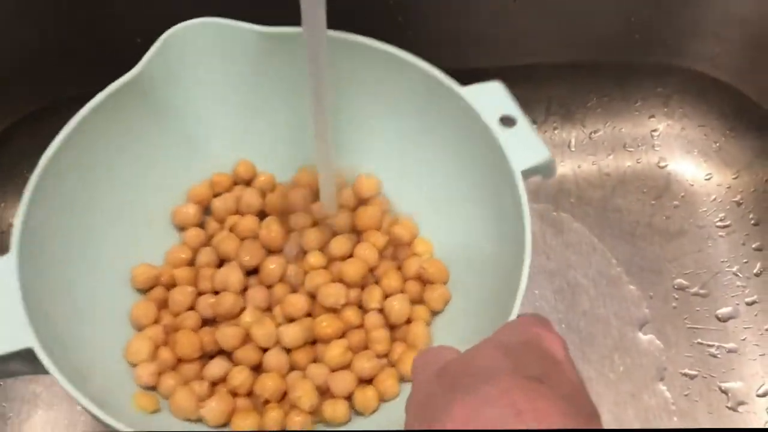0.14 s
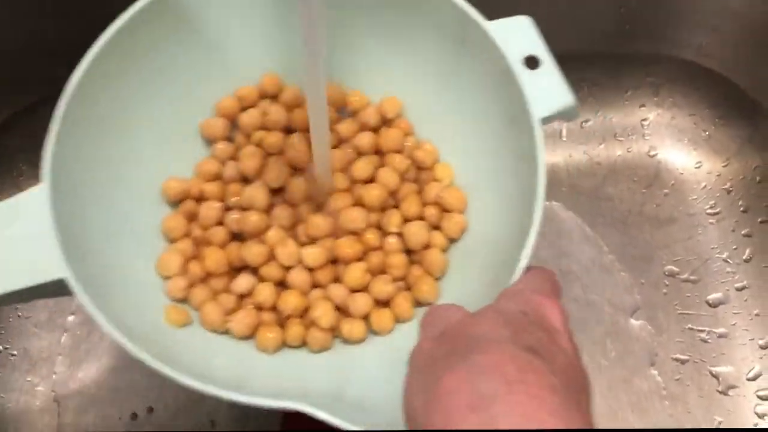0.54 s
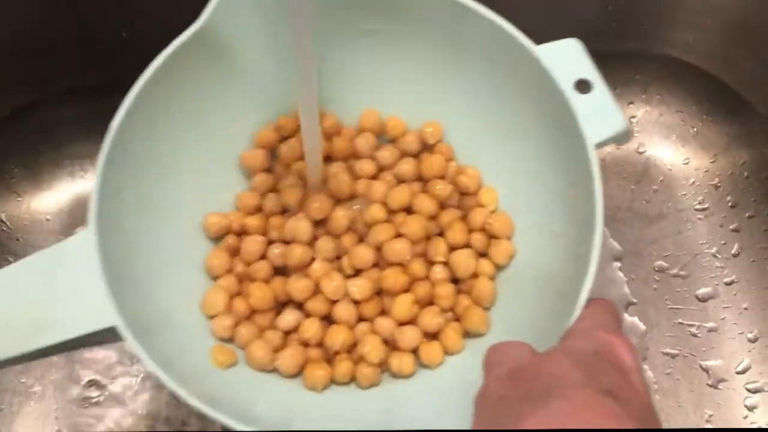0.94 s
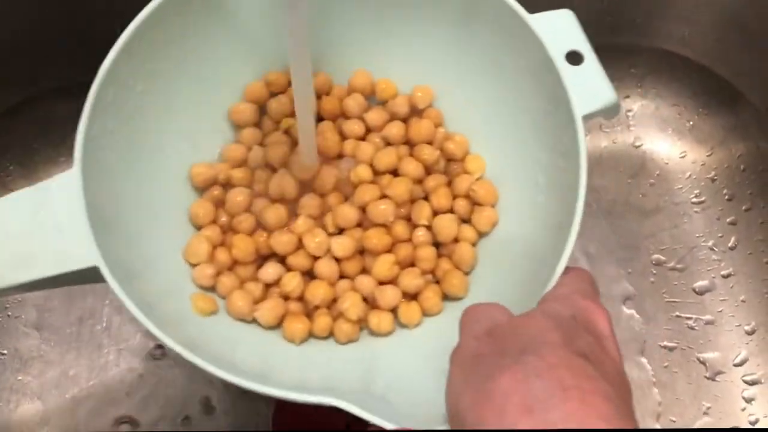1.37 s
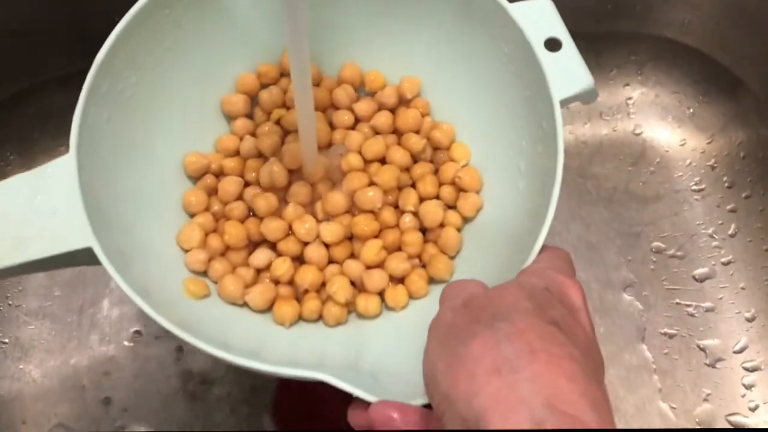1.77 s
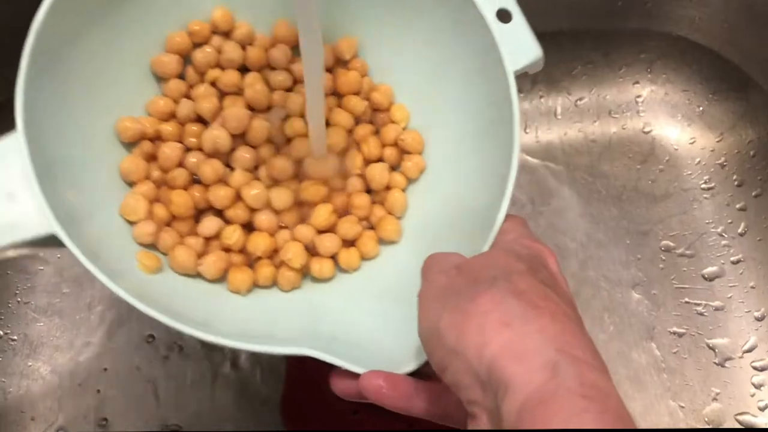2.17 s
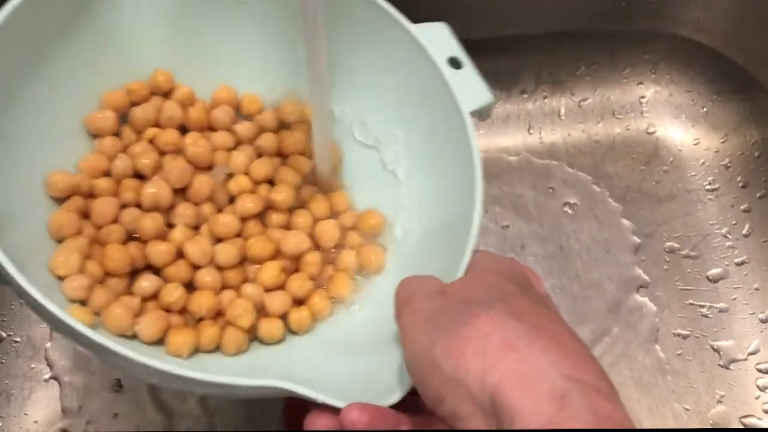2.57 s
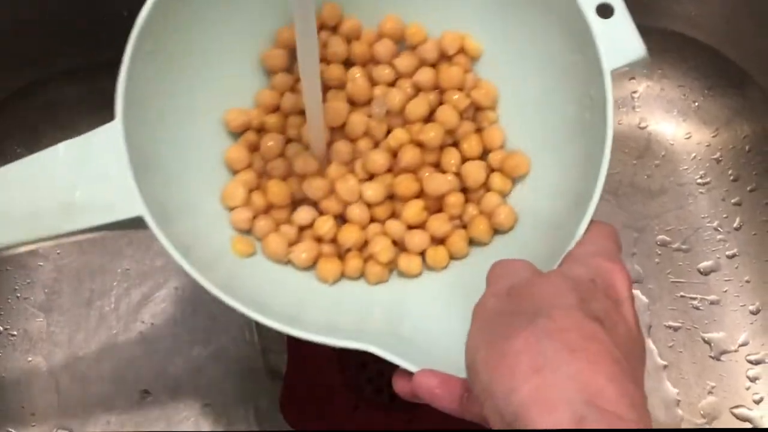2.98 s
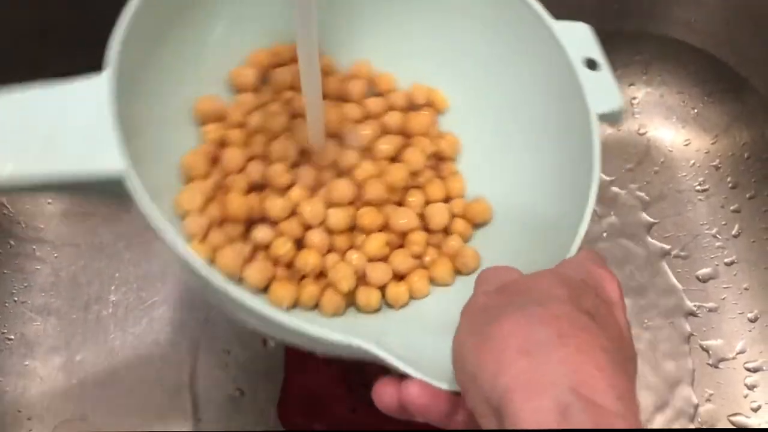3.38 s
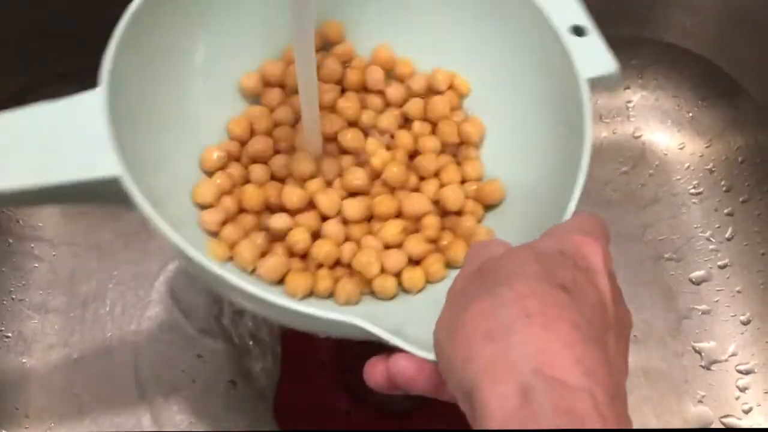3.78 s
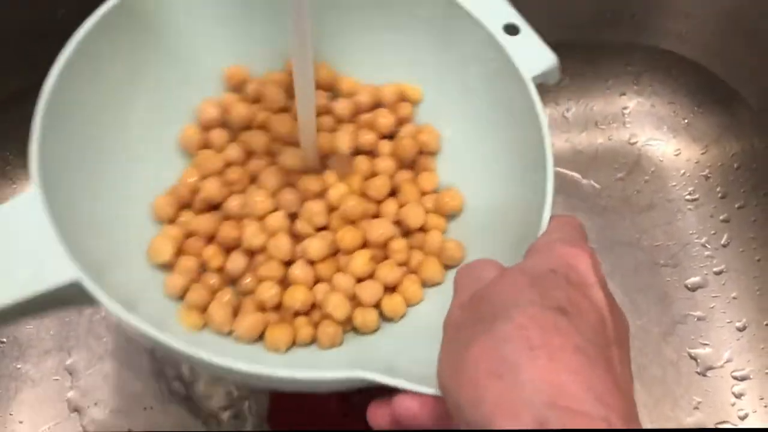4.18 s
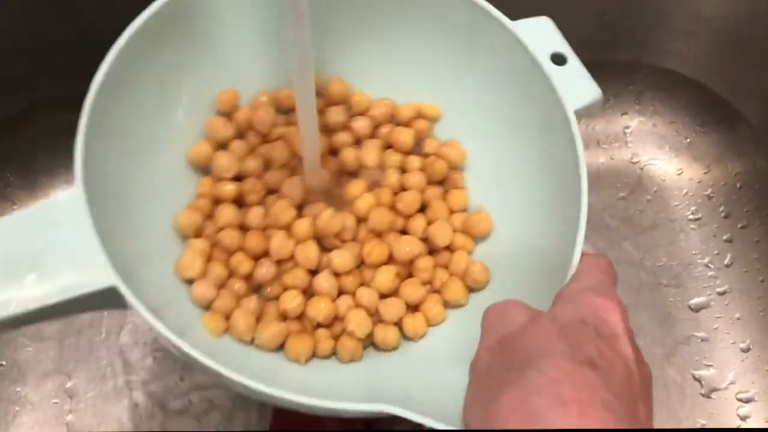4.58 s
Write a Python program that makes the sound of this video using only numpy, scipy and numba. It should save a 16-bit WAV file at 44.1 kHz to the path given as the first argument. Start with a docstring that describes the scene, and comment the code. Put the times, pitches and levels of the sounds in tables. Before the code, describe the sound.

A kitchen tap streams onto chickpeas in a plastic colander, bright bubbly fizzing and splashing, with a few dull bumps against a steel sink.

```python
"""In a kitchen, a tap runs onto chickpeas in a plastic colander held over a steel sink.
The jet traps air between the peas: swarms of short bubbles chirp upwards, made of sine tones that swell,
fade and glide. Loud single bubbles, gargles and droplet clicks join them, over a splash hiss of filtered noise.
Drained water drums the basin and the colander bumps it now and then, both ringing its steel modes;
appliances hum quietly behind."""
import sys
import numpy as np
from scipy import signal
from scipy.fft import rfft, irfft
from scipy.io import wavfile
from scipy.ndimage import uniform_filter1d
from numba import njit

SR = 44100
rng = np.random.default_rng(int(sys.argv[2]) if len(sys.argv) > 2 else 0)


def transcribe(u):
    """Save the signal u as a 16-bit wav file named by the first command-line argument.

    u: samples, shape (n,) or (channels, n), limited to [-1, 1]; the rate is SR.
    q: integer samples, one column per channel.
    """
    v = np.clip(np.atleast_2d(u).T, -1, 1)
    q = np.round(v * 32767).astype(np.int16)
    wavfile.write(sys.argv[1], SR, q)


N = 208409  # length in samples

# Kinds of bubble swarm, and droplets striking peas and plastic (clicks of a cycle or two):
# pitch spread/octaves, rate/(1/s), length/cycles, mean upward glide/octaves, size scatter/dB
COARSE_BUBBLES = (0.37, 2600, 7.4, 0.94, 6.1)
FINE_BUBBLES = (0.24, 3000, 7.0, 0.75, 5.1)
SPRAY_BUBBLES = (0.28, 4000, 5.2, 0.37, 6)
GURGLE_BUBBLES = (0.3, 650, 11, 0.15, 2.2)
DROPLET_CLICKS = (1.22, 506, 1.26, -0.5, 2.5)
# The jet as the colander is swirled under it: t/s, fine bubble level/dB, coarse level re fine/dB
JET_LEVELS = [(0.0, -38.5, -4), (0.06, -41, -7), (0.24, -37.5, -23), (0.28, -44.5, -6.5), (0.4, -40, -5),
              (0.55, -43.5, -5), (0.86, -43.5, -6.5), (0.97, -38, -7.5), (1.15, -43.5, -16),
              (1.3, -40, -12.5), (1.45, -40, -6.5), (1.55, -46, 4.5), (1.59, -46, 3.5), (1.63, -42.5, -0.5),
              (1.72, -40.5, -0.5), (1.84, -43, -5), (1.89, -45, -14), (1.93, -41, -9), (1.97, -42.5, -6),
              (2.32, -44.5, -10.5), (2.39, -45, -6), (2.58, -42.5, -2), (2.67, -40.5, -7.5),
              (2.7, -41.5, -8.5), (2.74, -42, -4), (2.82, -46.5, -9), (2.9, -43.5, -4.5), (2.96, -49, -5.5),
              (3.01, -39.5, -17), (3.13, -45, -11), (3.24, -43, -5.5), (3.3, -47.5, -6), (3.38, -41, -2),
              (3.43, -41.5, -4), (3.53, -49.5, -8.5), (3.64, -43.5, 1), (3.78, -40.5, -6),
              (3.86, -49.5, -4), (3.96, -43, -8), (4.02, -40, -1), (4.08, -47, 5), (4.13, -49, 0),
              (4.16, -45.5, 0), (4.21, -45, -1.5), (4.33, -43, 0.5), (4.42, -47.5, 3), (4.56, -40, 0),
              (4.66, -44.5, 1.5), (4.73, -47.5, 3)]
# Slow drift; bubbles are largest where the jet meets the bare rim:
# t/s, coarse f/Hz, fine f/Hz, spray level/dB (before it follows the jet), gurgle level/dB
SLOW_DRIFT = [(0, 4220, 7880, -48, -59), (0.5, 3890, 7130, -50.5, -61.5), (1.0, 4640, 7080, -44, -59),
              (1.3, 4370, 7500, -47, -57), (1.7, 4460, 7520, -45, -67), (2.0, 4550, 6810, -52.5, -61.5),
              (2.45, 3280, 7440, -49.5, -63), (2.7, 3600, 8120, -53, -58), (2.9, 4120, 6850, -50, -58),
              (3.05, 4240, 7320, -49, -58.5), (3.25, 4150, 7830, -47.5, -59), (3.5, 4060, 7380, -47, -56),
              (4.1, 4300, 6840, -51.5, -58), (4.73, 4500, 7260, -47, -57.5)]
# Loud single bubbles, from tiny bright ones to large glugs: t/s at the peak, peak level/dB, f/Hz at the peak
LOUD_BUBBLES = [(0.1654, -20.5, 8040), (0.2285, -23, 7900), (0.265, -37, 7600), (0.52, -46, 1600),
                (0.3445, -29, 4200), (0.349, -24, 5760), (0.3903, -25, 7200), (0.4025, -22, 7000),
                (0.4126, -24, 7900), (0.4395, -24, 8800), (0.462, -34, 3480), (0.472, -32, 4050),
                (0.4953, -22, 7700), (0.51, -35, 4200), (0.5286, -33, 3280), (0.563, -25.5, 3420),
                (0.5818, -26.5, 4100), (0.596, -35, 3600), (0.6286, -28, 3960), (0.676, -24, 7400),
                (0.693, -19.5, 12500), (0.711, -21.5, 7100), (0.9279, -20, 6100), (0.997, -25, 5400),
                (1.0252, -19, 10600), (1.0399, -24, 8200), (1.064, -44, 1790), (1.0722, -19.5, 4850),
                (1.0767, -21, 7840), (1.0825, -20, 7700), (1.088, -22, 7400), (1.108, -23, 8060),
                (1.156, -46, 1310), (1.183, -43, 1740), (1.208, -21, 7200), (1.296, -17.5, 7900),
                (1.305, -47, 1390), (1.4697, -22, 11600), (1.509, -25.5, 5000), (1.543, -24.5, 5450),
                (1.618, -28, 4600), (1.628, -30, 4300), (1.65, -27, 4560), (1.661, -28, 4500),
                (1.6817, -29, 7280), (1.6896, -16, 8460), (1.7236, -27, 4020), (1.732, -23, 4600),
                (1.745, -29.5, 3200), (1.7725, -31, 3300), (1.8176, -27, 6660), (1.853, -25.5, 5020),
                (1.97, -43, 2260), (1.997, -21, 7000), (2.0468, -25, 6560), (2.0538, -22, 12700),
                (2.059, -29, 6330), (2.124, -24.5, 5900), (2.279, -39.5, 2200), (2.361, -23, 8260),
                (2.3933, -18.5, 9500), (2.4788, -27.5, 3500), (2.5056, -24, 6000), (2.584, -43, 1870),
                (2.5859, -28, 3520), (2.6147, -30.5, 3060), (2.6098, -26, 6960), (2.6618, -26, 9120),
                (2.6742, -24.5, 8900), (2.727, -23, 8450), (2.7702, -22, 14550), (2.801, -33, 3900),
                (2.834, -43, 1380), (2.8683, -20.5, 13500), (2.956, -44, 1800), (2.994, -25, 8300),
                (3.012, -30, 6000), (3.051, -29, 5800), (3.113, -31, 14000), (3.1574, -23, 6740),
                (3.163, -23, 8000), (3.172, -33, 12500), (3.286, -42, 1800), (3.324, -26, 10200),
                (3.3872, -23.5, 7340), (3.416, -26, 6500), (3.46, -41.5, 1870), (3.572, -44.5, 1250),
                (3.59, -35.5, 1430), (3.597, -22, 7560), (3.599, -41, 1570), (3.611, -39.5, 1290),
                (3.6373, -23, 7800), (3.663, -21, 6400), (3.678, -27, 6000), (3.741, -30, 7000),
                (3.829, -40, 2110), (3.978, -30, 4000), (4.0145, -24, 4480), (4.0333, -27, 4370),
                (4.057, -34, 4100), (4.0591, -20.5, 11200), (4.0818, -29, 4330), (4.106, -27, 7500),
                (4.3096, -27, 4620), (4.346, -22, 5040), (4.352, -31, 6270), (4.451, -29, 6160),
                (4.5, -28, 7200), (4.547, -43, 2200), (4.5641, -24.5, 5300)]
# An air pocket under the peas gargles: t/s at the middle, length/s, level/dB, f/Hz, rise/octaves
AIR_GARGLES = [(0.268, 0.1, -56.5, 1450, 0.03), (0.707, 0.16, -53.5, 1312, 0.2),
               (0.89, 0.07, -54, 1580, 0.03)]
# Colour of the splash hiss; only the shape counts: f/Hz, relative level/dB per Hz
SPLASH_COLOUR = [(18, -40), (50, -2), (105, -15), (125, 0), (230, -8), (330, -1.5), (395, -11.5), (755, -7),
                 (1060, -7), (1310, -10), (1990, -14), (2250, -4.5), (7400, -11), (15800, -5.5)]
# Splash between 350 and 1000 Hz; only the changes count: t/s, level/dB
SPLASH_LOW_MIDS = [(0.0, -57.5), (0.25, -64), (1.03, -62), (1.28, -59), (1.96, -65), (2.24, -66),
                   (2.72, -64.5), (3.12, -62), (3.57, -62), (4.73, -63)]
# Swell of the drumming under the drain; only the changes count: t/s, level/dB
DRAIN_SWELL = [(0.3, -3), (1.4, 1.5), (3.0, -2), (3.7, -2), (4.73, -2)]
# Steel modes of the basin; close pairs beat, so a thump swells before it dies:
# f/Hz, relative level/dB, free ring t60/s
BASIN_MODES = [(181.8, -2.5, 0.18), (172.6, 3.5, 0.2), (214, -5, 0.12), (304, -11.5, 0.071),
               (455, -9, 0.18), (707, 2, 0.055), (1310, -13.5, 0.073), (1850, -26, 0.025)]
# The colander bumps the basin: t/s, blow level/dB, hardness/(dB per octave),
# share of the ring time left while it rests on the steel/(0-1)
COLANDER_BUMPS = [(0.008, -50, 3.5, 0.56), (0.7066, -32.5, -2.5, 1), (1.458, -32, -11, 0.16),
                  (4.47, -35, -17, 0.14)]
# Appliance hums: f/Hz, level/dB rms
APPLIANCE_HUMS = [(58, -79.5), (90, -83), (118, -68)]

SIZE_WANDER = 0.075  # octaves, wander of the coarse and fine pitch
LARGEST = 1.2  # spreads under the centre pitch: the gaps between peas cap the bubble size
SPRAY_HZ, GURGLE_HZ, CLICK_HZ = 12840, 1508, 7100  # centre pitches
SPRAY_FOLLOW, SPRAY_WANDER_DB = 0.32, 1.5  # share of the jet's swings; own wander
GURGLE_SURGE_DB = 1.2
CLICK_DB = -7  # re the fine bubbles, before the high-pass
PEA_HZ, BASIN_LOW_HZ = 2140, 113  # small sources radiate little below these
TRAIL_S, TRAIL_DB, TRAIL_SPREAD = 0.0062, -8, 0.13  # mean lag; highest level re the loud bubble; octaves
GARGLE_WIDTH_HZ = 190  # how fast the roughness changes
BOWL_T60_S, BOWL_DB = 0.1, -10  # short ring of bowl and basin
SPLASH_DB, SPLASH_FOLLOW, SPLASH_FLICKER_DB = -48, 0.32, 2.2  # rms; share of the flow's swings; own flicker
DRUM_DB, DRUM_FLICKER_DB = -58.5, 3  # rms before the high-pass; flicker
DRUM_DAMP = 0.17  # share of the ring time left: wet steel rings shorter under falling water
BASIN_RISE = 5.1  # cycles: the blow spreads through the steel before a mode swings fully
SCUFF_DB, SCUFF_T60_S, SCUFF_HZ = -3.5, 0.1, 1480  # wet contact noise, re the blow at hardness 0
MIC_LOW_HZ, TOP_HZ = 43.3, 15830


def undb(db):
    """Decibels to gain."""
    return 10 ** (np.asarray(db) / 20)


def level(x, db):
    """Scale to an rms level."""
    return x * undb(db) / np.sqrt(np.mean(x ** 2))


def curve(t, table):
    """Straight lines through a table whose first column is time; one curve for each other column."""
    columns = np.transpose(table)
    return [np.interp(t, columns[0], column) for column in columns[1:]]


def walk(rate):
    """Random levels held 1 / rate s, then smoothed twice; spread near 1."""
    hold = int(SR / rate)
    steps = np.repeat(rng.standard_normal(N // hold + 1), hold)
    return 1.284 * uniform_filter1d(uniform_filter1d(steps, hold), hold)[:N]


def ring(x, hz, t60):
    """One decaying mode, unit swing for a unit blow."""
    r = np.exp(-np.log(1000) / (t60 * SR))
    w = 2 * np.pi * hz / SR
    return signal.lfilter([0, np.sin(w)], [1, -2 * r * np.cos(w), r * r], x)


def above(x, hz):
    """High-pass."""
    return signal.sosfilt(signal.butter(2, hz, "high", fs=SR, output="sos"), x)


@njit
def bubbles(n, peak, hz, cycles, glide, size, turn, soft):
    """Each bubble swells, fades and glides, rising as it nears the surface; peak and hz hold at its loudest."""
    out = np.zeros(n)
    for k in range(len(peak)):
        tau = cycles[k] * SR / hz[k] / 3  # samples from start to peak
        phase = turn[k]
        start = max(peak[k] - int(tau), 0)
        for j in range(min(int(6 * tau), n - start)):
            u = j / tau
            f = hz[k] * 2 ** (glide[k] * (min(u, 4.) - 1) / 3)
            if f > .45 * SR:
                break
            phase += 2 * np.pi * f / SR
            out[start + j] += size[k] * (u * np.exp(1 - u)) ** soft * np.sin(phase)
    return out


def swarm(kind, hz, burst_db):
    """Bubbles at random moments round a centre pitch hz, mostly small, coming in bursts; rms 1."""
    spread, rate, cycles, glide, scatter_db = kind
    count = min(int(rate * N / SR), 30000)
    u, g = rng.random((4, count)), rng.standard_normal((2, count))
    peak = (u[0] * N).astype(np.int64)
    size = undb(scatter_db * np.minimum(-np.log(1 - u[1]), 3.1))
    # pitches below the LARGEST limit fold back up
    offset = np.minimum(np.abs(g[0] + LARGEST) - LARGEST, 2)
    pitch = (hz * np.ones(N))[peak] * 2 ** (spread * offset)
    y = bubbles(N, peak, pitch, cycles * 2 ** (0.36 * g[1]), glide * 2 * u[2], size, 2 * np.pi * u[3], 2.2)
    return level(y * undb(burst_db + 0.48 * walk(40)), 0)


def bubble_swarms(t, fine_db, coarse_db, sputter_db):
    """Air trapped by the jet leaves as coarse, fine, spray and gurgle bubbles."""
    coarse_hz, fine_hz, spray_db, gurgle_db = curve(t, SLOW_DRIFT)
    coarse_hz = coarse_hz * 2 ** (SIZE_WANDER * walk(24))
    fine_hz = fine_hz * 2 ** (SIZE_WANDER * walk(24))
    spray_db = spray_db + SPRAY_FOLLOW * (fine_db - fine_db.mean()) + SPRAY_WANDER_DB * walk(10)
    coarse = undb(coarse_db) * swarm(COARSE_BUBBLES, coarse_hz, sputter_db)
    fine = undb(fine_db) * swarm(FINE_BUBBLES, fine_hz, sputter_db)
    spray = undb(spray_db) * swarm(SPRAY_BUBBLES, SPRAY_HZ, sputter_db)
    gurgle = undb(gurgle_db) * swarm(GURGLE_BUBBLES, GURGLE_HZ, GURGLE_SURGE_DB * walk(25))
    return coarse + fine + spray + gurgle


def single_bubbles(cycles, glide, soft, count=3):
    """Loud bubbles, each with a trail of smaller ones breaking off; large ones ring longer and glide less."""
    s, db, hz = np.transpose(LOUD_BUBBLES)
    small = (hz / PEA_HZ) ** 0.33
    out = 0
    for k in range(1 + count):
        u = rng.random((6, len(s)))
        trail = min(k, 1)  # 0 for the loud bubble itself, 1 for its trail
        late_s = s - trail * TRAIL_S * np.log(1 - u[3])
        peak = (late_s * SR).astype(np.int64)
        pitch = hz * 2 ** (trail * TRAIL_SPREAD * 2 * (2 * u[4] - 1))
        size = undb(db + trail * (TRAIL_DB - 2 * u[5]))
        length = cycles / small * (0.66 + 0.52 * u[0])
        rise = glide * small * (.5 + u[1])
        out = out + bubbles(N, peak, pitch, length, rise, size, 2 * np.pi * u[2], soft)
    return out


def gargles(t):
    """An air pocket gives rough, wavering tones that swell and fade."""
    out = 0
    for s, length, db, hz, rise in AIR_GARGLES:
        u = np.clip((t - s) / length, -.5, .5)
        turn = 2 * np.pi * np.cumsum(hz * 2 ** (rise * u)) / SR
        rough = walk(GARGLE_WIDTH_HZ) * np.cos(turn) + walk(GARGLE_WIDTH_HZ) * np.sin(turn)
        out = out + undb(db) * np.cos(np.pi * u) * rough
    return out


def droplet_clicks(fine_db, sputter_db):
    """Droplets strike peas and plastic: very short tones, with little sound below PEA_HZ."""
    return undb(fine_db + CLICK_DB) * above(swarm(DROPLET_CLICKS, CLICK_HZ, sputter_db), PEA_HZ)


def bowl(x, count=5):
    """Dense early reflections in bowl and basin smear every bubble; they change as the bowl is swirled."""
    t = np.arange(int(.05 * SR)) / SR
    share = np.array([walk(8) for _ in range(count)])
    share = share / np.sqrt(np.sum(share ** 2, axis=0))
    tails = rng.standard_normal((count, len(t))) * 10 ** (-3 * t / BOWL_T60_S) * (t > .0005)
    tails = tails / np.sqrt(np.sum(tails ** 2, axis=1, keepdims=True))
    echoes = signal.oaconvolve(x * share, tails, axes=1)[:, :N].sum(axis=0)
    return x + undb(BOWL_DB) * echoes


def splash(t, flow_db):
    """The jet breaks up into hiss: half-octave noise bands flicker alone; the treble follows the flow."""
    hz = np.maximum(np.fft.rfftfreq(N, 1 / SR), 1)
    colour_hz, colour_db = np.transpose(SPLASH_COLOUR)
    colour = undb(np.interp(np.log(hz), np.log(colour_hz), colour_db))
    noise = rfft(rng.standard_normal(N)) * colour
    low_mid_db = curve(t, SPLASH_LOW_MIDS)[0] - np.transpose(SPLASH_LOW_MIDS)[1].mean() + 2.7 * walk(9)
    out = 0
    for centre in np.arange(4.5, 14.5, .5):  # octaves above 1 Hz
        shape = np.cos(np.pi * np.clip(np.log2(hz) - centre, -.5, .5)) ** 2
        band = irfft(noise * shape, N)
        follow = SPLASH_FOLLOW * np.clip(centre - 10.5, 0, 1)
        band_db = follow * flow_db + SPLASH_FLICKER_DB * walk(22.03)
        if 8.4 < centre < 10.1:
            band_db = band_db + low_mid_db
        out = out + band * undb(band_db)
    return level(out, SPLASH_DB)


def drumming(t):
    """Falling water acts as noise that keeps the damped steel modes ringing."""
    water = rng.standard_normal(N) * undb(DRUM_FLICKER_DB * walk(15) + curve(t, DRAIN_SWELL)[0])
    modes = [undb(db) * ring(water, hz, DRUM_DAMP * t60) for hz, db, t60 in BASIN_MODES]
    return level(sum(modes), DRUM_DB)


def bumps():
    """A blow rings every steel mode and adds a scuff; a harder one wakes the upper modes more."""
    out = np.zeros(N)
    for s, blow_db, hard_db, free in COLANDER_BUMPS:
        blow = np.zeros(N)
        blow[int(s * SR)] = undb(blow_db)
        fade = signal.lfilter([1], [1, -np.exp(-np.log(1000) / (SCUFF_T60_S * SR))], blow)
        scuff = ring(rng.standard_normal(N), SCUFF_HZ, 6 / SCUFF_HZ)
        out = out + undb(SCUFF_DB + 2 * hard_db) * fade * level(scuff, 0)
        for k, (hz, db, t60) in enumerate(BASIN_MODES):
            # taking away a shorter ring makes the swing build up gradually
            rise_t60 = free * min(BASIN_RISE / hz, t60 / 2)
            swing = ring(blow, hz, free * t60) - ring(blow, hz, rise_t60)
            gain = undb(db + hard_db * np.log2(hz / BASIN_MODES[0][0]))
            out = out + (-1) ** k * gain * swing
    return out


def appliance_hum(t):
    """Steady low sine tones whose levels waver slightly."""
    out = 0
    for hz, db in APPLIANCE_HUMS:
        out = out + undb(db + 0.41 * walk(3.0)) * np.sqrt(2) * np.sin(2 * np.pi * hz * t)
    return out


def scene():
    """All sources at one microphone."""
    t = np.arange(N) / SR
    fine_db, coarse_re_db = curve(t, JET_LEVELS)
    coarse_db = fine_db + coarse_re_db
    # the jet sputters: coarse, fine, spray and clicks surge together
    sputter_db = 0.53 * walk(34.86) + 1.25 * walk(150)
    water = bubble_swarms(t, fine_db, coarse_db, sputter_db)
    water = water + single_bubbles(cycles=19, glide=0.23, soft=6.0) + gargles(t)
    water = water + droplet_clicks(fine_db, sputter_db)
    flow_db = (coarse_db + fine_db) / 2
    hiss = splash(t, flow_db - flow_db.mean() + 3 * sputter_db)
    basin = above(drumming(t) + bumps(), BASIN_LOW_HZ)
    return (bowl(water) + hiss + basin + appliance_hum(t))[None]


def record(dry):
    """The microphone drops the deepest bass and the phone cuts the top."""
    thin = above(dry, MIC_LOW_HZ)
    return signal.sosfilt(signal.ellip(12, .2, 80, TOP_HZ, fs=SR, output="sos"), thin)


dry = scene()
out = record(dry)
transcribe(out)
```